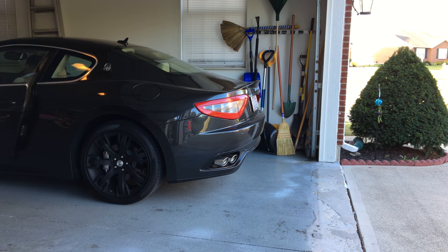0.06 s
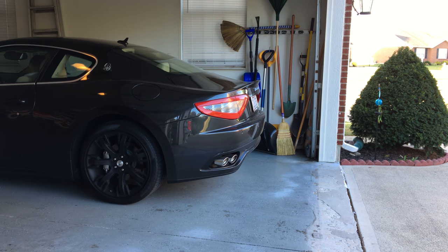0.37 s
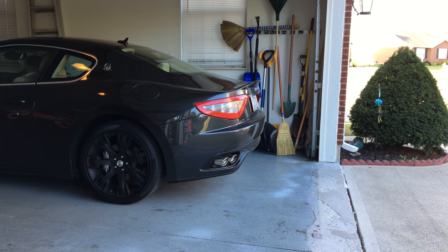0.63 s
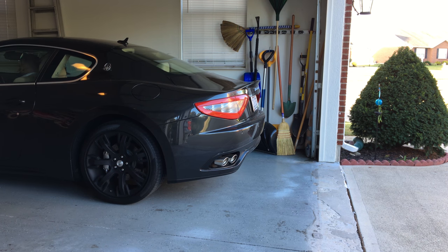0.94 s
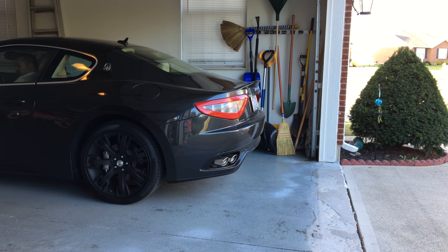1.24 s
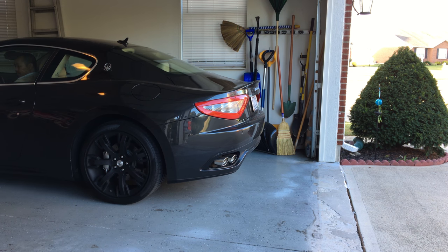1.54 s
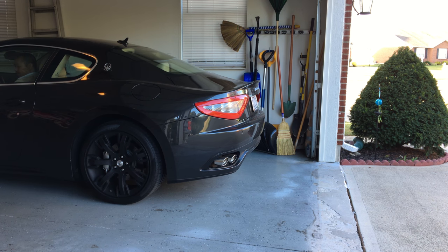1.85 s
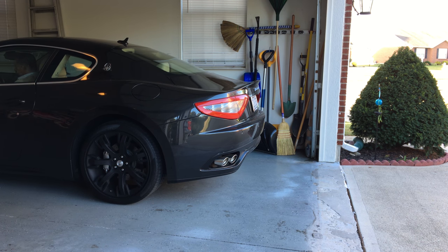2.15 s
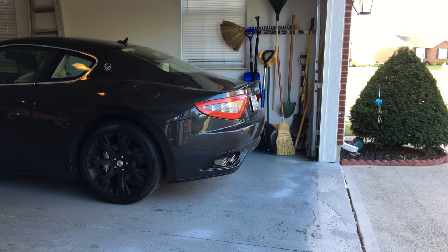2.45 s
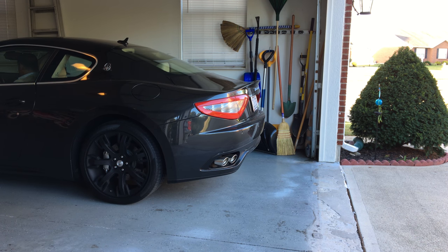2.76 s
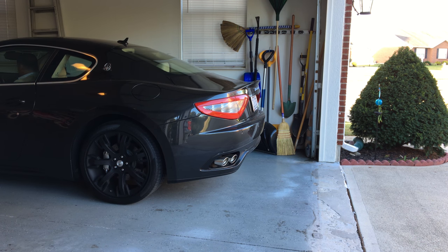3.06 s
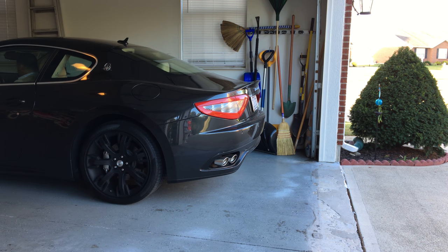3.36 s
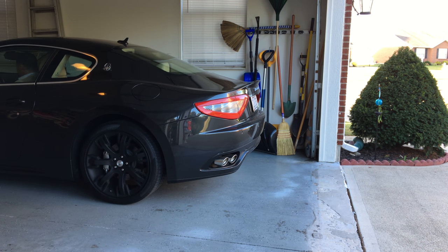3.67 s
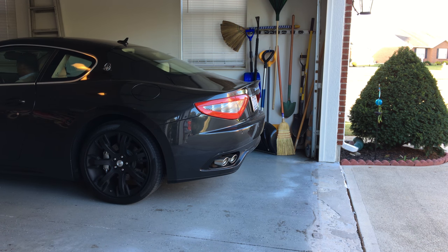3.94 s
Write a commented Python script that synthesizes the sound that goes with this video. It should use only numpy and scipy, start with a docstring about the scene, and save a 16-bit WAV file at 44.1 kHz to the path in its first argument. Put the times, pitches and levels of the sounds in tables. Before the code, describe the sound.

A car engine starts in an open garage. First a door thumps shut, then after a pause with faint outdoor hum, the starter clacks and whines, and the engine catches with a loud, deep, barking roar.

```python
"""A car door thumps shut in an open garage, over a faint outdoor hum. The starter clacks in, whines
against the compression strokes and rattles as it overruns. The cold V8 catches, flares up and roars:
each firing sends a thud and a bark down the exhaust, and the hardest crack out of the pipe.
The garage walls reverberate."""
import sys
import numpy as np
from scipy import signal
from scipy.fft import rfft, irfft, next_fast_len
from scipy.io import wavfile
from scipy.ndimage import map_coordinates

SR = 44100
rng = np.random.default_rng(int(sys.argv[2]) if len(sys.argv) > 2 else 0)


def unload_audio(sound):
    """Save the sound as a 16-bit wav file, at the path given as the first command line argument."""
    columns = np.transpose(np.atleast_2d(sound))
    # keep every value between -1 and 1, then stretch to whole-number steps
    steps = np.round(np.clip(columns, -1, 1) * 32767)
    wavfile.write(sys.argv[1], SR, steps.astype(np.int16))


N = 176400

# exhaust response to barks and cracks: f/Hz, level/dB
BARK_SPECTRUM = [(100, -23), (400, -6), (490, -5.5), (540, 3), (610, -10), (690, 1.5), (760, -7.5),
                 (840, 3.5), (1020, -5.5), (1130, -4.5), (1280, -7), (1520, -2), (1800, -7.5), (2150, -11),
                 (2700, -14), (3400, -30.5), (5400, -40), (6500, -39), (16000, -64)]


def amp(db):
    """Decibels to gain."""
    return 10 ** (np.asarray(db) / 20)


def unit(x):
    """Scale to rms 1."""
    return x / np.sqrt(np.mean(x ** 2) + 1e-20)


def along(points, hz):
    """Interpolate (f/Hz, value) points on a log axis."""
    f, v = np.transpose(points)
    return np.interp(np.log(hz + 1), np.log(f + 1), v)


def curves(rows):
    """One per-sample curve for each column after t/s."""
    s, *cols = np.transpose(rows)
    return [np.interp(np.arange(N) / SR, s, c) for c in cols]


def wobble(rate_hz):
    """Smooth random curve, rate_hz knots a second."""
    return map_coordinates(rng.standard_normal(N // 8), [np.arange(N) * rate_hz / SR], mode="wrap")


def colour(x, spectrum):
    """Minimum-phase filter of unit energy, shaped by (f/Hz, level/dB) points."""
    m = 2 ** 14
    cepstrum = irfft(np.log(amp(along(spectrum, np.fft.rfftfreq(m, 1 / SR)))))
    cepstrum[1:m // 2] *= 2
    cepstrum[m // 2 + 1:] = 0
    impulse = irfft(np.exp(rfft(cepstrum)))
    return signal.fftconvolve(x, impulse / np.linalg.norm(impulse))[:N]


def noise(spectrum):
    """Coloured noise of rms 1."""
    return unit(colour(rng.standard_normal(N), spectrum))


def fade(start_s, attack_s, t60_s):
    """Envelope of one blow."""
    t = np.maximum(np.arange(N) / SR - start_s, 0)
    return (1 - np.exp(-t / attack_s)) * np.exp(-np.log(1000) * t / t60_s)


def garage(x, wet_db):
    """Direct sound plus the walls' tail, at constant total power."""
    decay = [(60, 0.65), (400, 0.51), (2000, 0.47), (6000, 0.54), (15000, 0.21)]  # f/Hz, t60/s
    hz, t, bins = signal.stft(rng.standard_normal(SR * 3 // 4), SR, nperseg=256)
    bins = bins * np.exp(-np.log(1000) * t / along(decay, hz)[:, None])
    tail = signal.istft(bins, SR, nperseg=256)[1]
    tail = np.pad(tail / np.linalg.norm(tail), (SR // 250, 0))  # 4 ms pre-delay
    return (x + amp(wet_db) * signal.fftconvolve(x, tail)[:N]) / np.hypot(1, amp(wet_db))


def outdoor_hum():
    """Steady hum through the open garage door."""
    spectrum = [(20, -44), (41, -7.5), (81, -1.5), (98, 2), (112, -7), (188, -9.5), (222, -14), (291, -9.5),
                (382, -9), (516, -22), (625, -18), (756, -22.5), (890, -16.5), (1140, -18.5), (1380, -13.5),
                (1960, -23), (4100, -32), (9000, -46.5), (17000, -61)]  # f/Hz, level/dB
    return noise(spectrum) * amp(-42)


def door():
    """Each contact thumps the panels and clacks the latch."""
    contacts = [(.303, -20, -34.5), (0.3134, -15, -24), (.317, -8, -28), (.351, -15, -20)]  # seal, first catch, slam, second catch: t/s, thump/dB, clack/dB
    panel_modes = [(56.3, -8, 0.3), (97, -2.5, 0.34), (137, -11, 0.43), (175, -8.5, 0.16),
                   (205.5, -15, .25), (299, -21, 0.29), (409, -9.5, 0.7), (675, -22, 0.38)]  # door and body: f/Hz, level/dB, t60/s
    thud_spectrum = [(18, -33), (32, -4.5), (50, 4), (95, -4.5), (135, -3), (180, -2.5), (215, -8),
                     (260, -19), (320, -10.5), (410, -9), (490, -17.5), (660, -26), (1000, -32),
                     (2200, -90)]  # f/Hz, level/dB
    latch_spectrum = [(250, -22), (450, -0.5), (800, 1), (1500, -5), (2300, -4.5), (3400, -13),
                      (4200, -17.5), (6000, -20), (9000, -27), (16000, -33)]  # f/Hz, level/dB
    t = np.arange(N) / SR
    ring = sum(amp(db + mode_db) * fade(s, 0.0022, t60_s)
               * np.sin(2 * np.pi * (hz * (t - s) + rng.random()))
               for s, db, _ in contacts for hz, mode_db, t60_s in panel_modes)
    thud = noise(thud_spectrum) * sum(amp(db) * fade(s, 0.001, 0.3) for s, db, _ in contacts)
    clack = noise(latch_spectrum) * sum(amp(db) * fade(s, 0.00082, 0.084) for s, _, db in contacts)
    return amp(-7.5) * ring + garage(amp(-6) * thud, wet_db=-5) + garage(amp(2.5) * clack, wet_db=-1.5)


def starter():
    """The pinion clacks in; gears whine and grind under load, then rattle as the engine outruns them."""
    pinion_hits = [(2.494, -31), (2.501, -19.5), (2.506, -24)]  # t/s, level/dB
    pinion_spectrum = [(120, -37), (250, -22), (836, -14.5), (1040, -2), (1300, -10), (1800, -4.5),
                       (2800, -14), (4300, -6.5), (6500, -7.5), (9000, -10), (17000, -31)]  # f/Hz, level/dB
    clack = noise(pinion_spectrum) * sum(amp(db) * fade(s, 0.0014, 0.094) for s, db in pinion_hits)
    engaged = np.arange(N) / SR > pinion_hits[1][0]

    gear_mesh = [(2.5, 800, -66), (2.54, 950, -36), (2.6, 1073, -41), (2.635, 901, -32), (2.685, 922, -31),
                 (2.725, 900, -40), (2.79, 1120, -33.5), (2.83, 1085, -23), (2.87, 940, -33),
                 (2.905, 1080, -38), (2.942, 1130, -21.5), (2.995, 1100, -39), (3.04, 1220, -32.5),
                 (3.3, 1400, -56)]  # t/s, f/Hz, level/dB
    harmonics = [(1, -1), (2, -4.5), (3, -10.5), (4, -11), (5, -11)]  # mesh multiple, level/dB
    housing_spectrum = [(600, -4), (920, 0), (1150, -12), (1500, -1), (1850, 2), (2230, 4), (2700, -6),
                        (6000, -6.5)]  # f/Hz, level/dB
    mesh_hz, whine_db = curves(gear_mesh)
    phase = 2 * np.pi * np.cumsum(mesh_hz * (1 + 0.055 * wobble(330))) / SR
    teeth = sum(amp(db) * np.sin(k * phase) for k, db in harmonics) * amp(1.5 * wobble(260))
    whine = unit(colour(teeth, housing_spectrum)) * amp(whine_db)

    grind_levels = [(2.5, -44), (2.52, -27), (2.62, -33), (2.71, -31), (2.78, -34), (2.83, -32),
                    (2.89, -34.5), (2.93, -29.5), (2.99, -40), (3.2, -36.5), (3.34, -37.5), (3.6, -46),
                    (4, -67)]  # t/s, level/dB
    grind_spectrum = [(120, -27), (200, -9), (330, -16), (420, -6), (720, -8.5), (900, -10), (1600, -6),
                      (2100, -3), (2700, -7), (4200, -9.5), (7000, -16.5), (9500, -18.5), (12000, -22),
                      (17000, -32)]  # f/Hz, level/dB
    grind = noise(grind_spectrum) * amp(curves(grind_levels)[0] + 1.5 * wobble(300))

    overrun_hits = [(3.009, -28), (3.081, -28.5), (3.108, -39.5), (3.162, -29), (3.243, -29)]  # t/s, level/dB
    rattle_spectrum = [(410, -39), (700, -12.5), (1130, -3.5), (1420, 1), (1640, -10.5), (2260, -3),
                       (3420, -7.5), (4230, -4), (5500, -10.5), (9000, -13.5), (17000, -22.5)]  # f/Hz, level/dB
    rattle = noise(rattle_spectrum) * amp(2.7 * wobble(400))
    rattle *= sum(amp(db) * fade(s, 0.0048, 0.18) for s, db in overrun_hits)
    gears = engaged * (whine + grind) + amp(5.5) * rattle
    return garage(amp(2) * clack, wet_db=-7.5) + garage(gears, wet_db=-5)


def intake():
    """Air hisses in as the revs flare, then the throttle eases back."""
    levels = [(3.2, -69), (3.34, -42.5), (3.45, -39), (3.6, -33), (3.7, -45.5), (3.85, -45), (4, -49.5)]  # t/s, level/dB
    spectrum = [(1000, -24), (3000, 2), (5500, 0.5), (7000, -2), (9000, -3.5), (12000, -10.5), (17000, -21)]  # f/Hz, level/dB
    drawing = np.arange(N) / SR > levels[0][0]
    return garage(noise(spectrum) * amp(curves(levels)[0]) * drawing, wet_db=-3.5)


def pumping():
    """Low chuff of air pumped through the exhaust."""
    levels = [(2.55, -66), (2.7, -48), (2.85, -38.5), (3.28, -40), (3.34, -22), (3.45, -23), (3.6, -33),
              (4, -55)]  # t/s, level/dB
    spectrum = [(22, -11), (32, -13), (44, 0), (66, -4.5), (100, -13), (200, -40), (600, -63)]  # f/Hz, level/dB
    return noise(spectrum) * amp(curves(levels)[0])


def cracks():
    """The hardest firings: a short burst through the pipe and a tick of its sheet metal."""
    hits = [(3.43, -23, -37), (3.449, -14, -30.5), (3.475, -11.5, -36), (3.514, -12.5, -30),
            (3.534, -13, -32), (3.567, -12.5, -33), (3.614, -2.5, -30), (3.643, -11, -31),
            (3.6872, -4, -24.5), (3.759, -10, -21.5), (3.832, -10, -27), (3.906, -17, -49),
            (3.965, -18.5, -54), (3.982, -19.5, -48)]  # t/s, burst/dB, tick/dB
    tick_spectrum = [(2500, -32), (3800, -10), (4400, 3), (5400, 4), (6100, -27), (12000, -45)]  # f/Hz, level/dB
    burst = rng.standard_normal(N) * sum(amp(db) * fade(s, 0.00036, 0.017) for s, db, _ in hits)
    tick = noise(tick_spectrum) * sum(amp(db) * fade(s, 0.00076, 0.02) for s, _, db in hits)
    return garage(colour(amp(6) * burst, BARK_SPECTRUM) + amp(4) * tick, wet_db=-2.5)


def engine():
    """Each firing sends a thud and a rasping bark down the pipe; the strongest orders boom as tones."""
    speed = [(3.3, 56), (3.4, 78), (3.49, 92), (3.575, 101), (3.65, 110), (3.72, 111), (3.8, 110),
             (3.87, 109), (3.94, 105.5), (4, 104)]  # t/s, firing rate/Hz
    exhaust_levels = [(3.29, -62, -73, -70), (3.33, -37.5, -49.5, -55), (3.4, -17, -23.5, -19),
                      (3.48, -11, -23, -18.5), (3.55, -12.5, -17, -11.5), (3.615, -15.5, -18.5, -8.5),
                      (3.69, -15, -20, -12), (3.78, -19, -18.5, -14), (3.88, -17, -22, -13.5),
                      (3.94, -19, -27, -16.5), (4, -16.5, -33, -11)]  # t/s, thud/dB, bark/dB, boom/dB
    cylinders = [(3.5, 2.5), (1, 0.5), (7.5, -5), (2.5, 6), (7, 2), (-3.5, -8), (5.5, 7.5), (-1, 3.5)]  # in firing order: thud/dB, bark/dB
    far_bank = [0, 1, 0, 0, 1, 0, 1, 1]  # in firing order: 1 = far cylinder bank
    first_cylinder_s, bank_lag_s, jitter_s = 3.6145, 0.001223, 0.00025
    t = np.arange(N) / SR
    firing_hz, = curves(speed)
    thud_db, bark_db, boom_db = curves(exhaust_levels)
    running = t > exhaust_levels[0][0]
    count = np.cumsum(firing_hz) / SR
    count -= np.interp(first_cylinder_s, t, count)  # the first cylinder fires at this instant
    fired = np.flatnonzero(np.diff(np.floor(count))) + 1
    fired = fired[running[fired]]
    cylinder = np.floor(count[fired]).astype(int) % len(cylinders)

    scatter = rng.standard_normal((len(fired), 3))  # thud, bark, timing
    size = amp(np.array(cylinders)[cylinder] + scatter[:, :2] * [1.8, 0.9])
    size /= np.sqrt(np.mean(size ** 2, axis=0))
    size *= np.sqrt(SR / firing_hz[fired])[:, None]  # power independent of speed
    lag_s = bank_lag_s * np.array(far_bank)[cylinder] + jitter_s * scatter[:, 2]
    arrival = np.minimum(fired + (lag_s * SR).astype(int), N - 1)
    thuds, barks = np.zeros((2, N))
    thuds[arrival] = size[:, 0] * amp(thud_db[fired])
    barks[arrival] = size[:, 1] * amp(bark_db[fired])

    pipe_spectrum = [(30, -46), (62, -4), (85, -13), (110, -1.5), (145, 10), (190, 0), (222, 1.5),
                     (255, -6.5), (287, -1), (325, 0), (372, -1.5), (410, -7.5), (600, -19), (1500, -52)]  # f/Hz, level/dB
    puff = fade(0, 0.0012, 0.025)
    rasp = signal.fftconvolve(barks, puff / np.linalg.norm(puff))[:N] * rng.standard_normal(N)
    bark = colour(amp(-4) * barks + amp(-4.5) * rasp, BARK_SPECTRUM)
    rumble = colour(thuds + amp(thud_db - 8) * rng.standard_normal(N), pipe_spectrum)

    boom_orders = [(8, 0), (11, -12), (21, -14), (24, -7)]  # engine-cycle multiple, level/dB
    shudder_levels = [(3.3, -48), (3.4, -20), (3.49, -11.5), (3.55, -34), (3.7, -37), (4, -45)]  # deep tone as the revs climb: t/s, level/dB
    cycle_rad = 2 * np.pi * count / len(cylinders)
    tones = sum(amp(db + 0.49 * wobble(15)) * np.sin(k * cycle_rad) for k, db in boom_orders)
    boom = unit(tones) * amp(boom_db)
    shudder = np.sqrt(2) * amp(curves(shudder_levels)[0]) * np.sin(6 * cycle_rad)
    return running * (garage(rumble, wet_db=-2.5) + boom + shudder) + garage(bark, wet_db=-1.5)


def scene():
    """Door, starter and engine over the outdoor hum; mono."""
    return (door() + starter() + engine() + pumping() + cracks() + intake() + outdoor_hum())[None]


def record(dry):
    """Treble ripple of the microphone port, soft peak limiting, low-pass."""
    port_ripple = [(2400, 0.5), (2900, -2.5), (3300, -0.5), (4300, 1.5), (4850, -3), (5400, 2.5), (6500, 1),
                   (7500, -1.5), (8900, 3.5), (9700, 2.5), (10450, -1), (11300, 1.5)]  # f/Hz, level/dB
    cutoff_hz = 17100
    m = next_fast_len(N + SR // 2)
    hz = np.fft.rfftfreq(m, 1 / SR)
    rippled = irfft(rfft(dry, m) * amp(along(port_ripple, hz) - port_ripple[0][1]), m)[..., :N]
    limited = rippled / (1 + np.abs(rippled) ** 6) ** (1 / 6)
    return irfft(rfft(limited, m) * (hz < cutoff_hz), m)[..., :N]


dry = scene()
out = record(dry)
unload_audio(out)
```